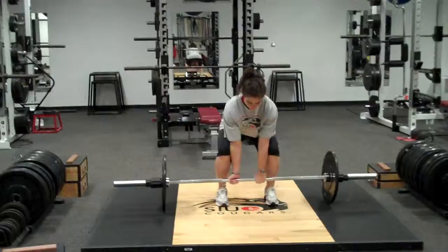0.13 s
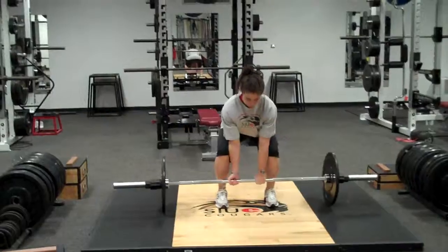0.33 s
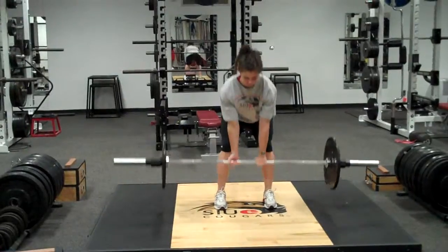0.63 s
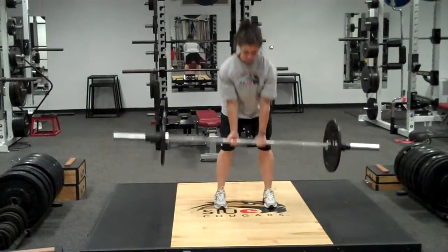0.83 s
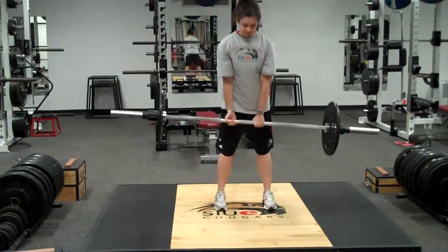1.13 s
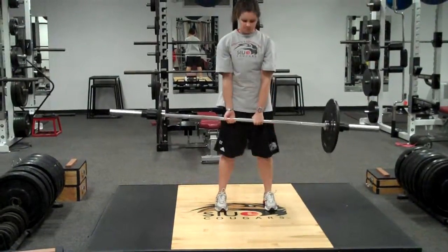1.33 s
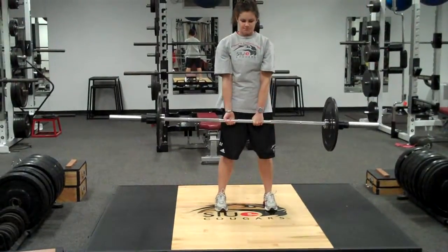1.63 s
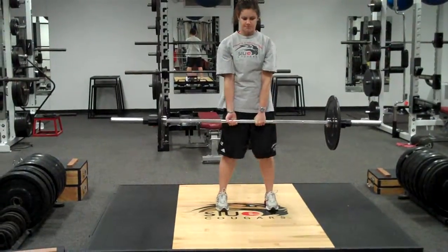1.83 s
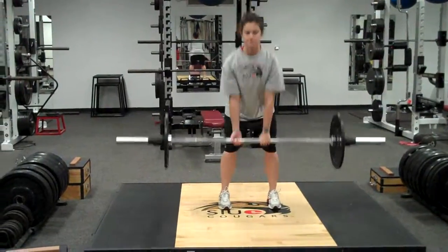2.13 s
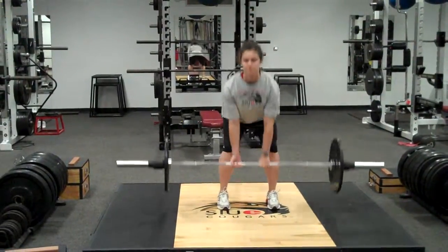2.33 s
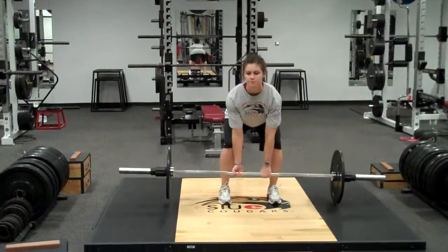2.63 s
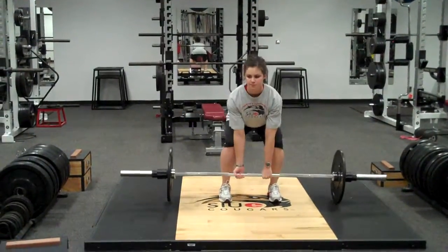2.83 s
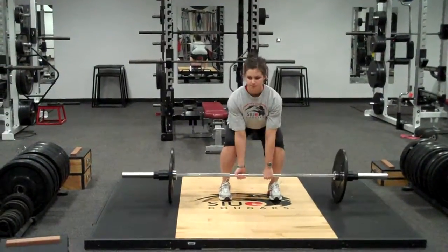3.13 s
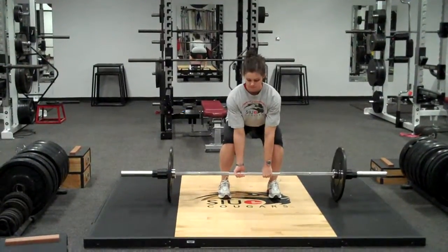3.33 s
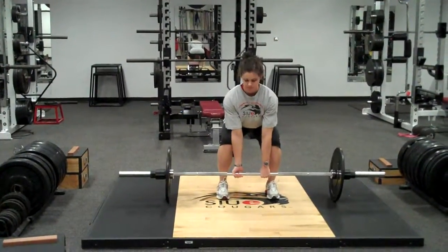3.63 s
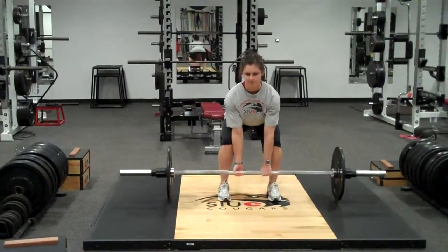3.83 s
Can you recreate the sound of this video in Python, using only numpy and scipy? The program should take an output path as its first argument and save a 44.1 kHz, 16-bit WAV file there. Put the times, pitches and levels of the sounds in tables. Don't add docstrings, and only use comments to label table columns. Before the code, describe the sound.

After a brief recorder thump, soles scrub softly and barbell plates tick upward; a quiet pause, then two hard, bright clanking landings with wooden thuds and a small settling rattle, in an echoing gym, from a few metres away.

```python
import sys
import numpy as np
from scipy import signal
from scipy.fft import rfft, irfft
from scipy.io import wavfile
from scipy.ndimage import uniform_filter1d

SR = 44100
rng = np.random.default_rng(int(sys.argv[2]) if len(sys.argv) > 2 else 0)


def waveform_to_disk(signal):
    frames = np.transpose(np.atleast_2d(signal))
    scaled = np.clip(frames, -1, 1) * 32767
    samples = np.round(scaled).astype(np.int16)
    wavfile.write(sys.argv[1], SR, samples)


def voltage_ratio(decibels):
    exponent = np.asarray(decibels, float) / 20
    return 10 ** exponent


N = 176400

# level in dB, low edge in Hz, high edge in Hz.
CRACKS = dict(pull=(4.1, 1200, 9800), lockout=(0.91, 2630, 7400), first=(-11, 3200, 5700),
          second=(-4.5, 1180, 7200), settle=(0, 3100, 6300), platform=(-1, 370, 1900))


def table(rows, at, log=False):
    x, y = np.array(rows, float).T
    if log:
        return np.interp(np.log(at + 1), np.log(x), y)
    return np.interp(at, x, y)


def unit(x):
    return x / np.sqrt(np.mean(x ** 2))


def resonance(f, hz, width_hz):
    return 1 / (1 + (2 * (f - hz) / width_hz) ** 2)


def noise(gain, size=N):
    alike_hz = 2050
    hz = np.fft.rfftfreq(size, 1 / SR)
    a, b = rfft(rng.standard_normal((2, size)))
    alike = 1 / (1 + (hz / alike_hz) ** 2)
    mid = a * np.sqrt(1 + alike)
    side = b * np.sqrt(1 - alike)
    return irfft(gain(hz) * np.array([mid + side, mid - side]), size) / np.sqrt(2)


def walk(rate, size=N):
    hold = int(SR / rate) + 1
    steps = np.repeat(rng.standard_normal(size // hold + 1), hold)
    return 1.3 * uniform_filter1d(uniform_filter1d(steps, hold), hold)[:size]


def bands(lo_hz, count):
    for hz in lo_hz * 2 ** (np.arange(count) * 2 / 3):
        def window(f, hz=hz):
            return np.cos(np.pi / 2 * np.clip(3 / 2 * np.log2((f + 1) / hz), -1, 1))
        yield hz, window


def ventilation():
    # frequency in Hz, spectral density in dB per Hz.
    air_colour = [(30, -41.5), (95, -31), (120, -3.5), (300, -6.5), (700, -17), (1500, -27), (3000, -37.5),
                  (8000, -48.5)]
    # frequency in Hz, width in Hz, level in dB.
    duct_modes = [(79.3, 6.7, -70.5), (134, 50, -65.5), (204.6, 6.6, -59.5), (341.3, 7.8, -71),
                  (477.7, 60, -65.5)]
    lag_s = .00007
    swell = walk(0.27)
    air = 0
    for hz, window in bands(25.76, count=15):
        band = noise(lambda f: window(f) * voltage_ratio(table(air_colour, f, log=True)))
        air = air + band * voltage_ratio(.6 * swell + 0.53 * walk(5.3))
    ducts = noise(lambda f: sum(voltage_ratio(db) * np.sqrt(SR / width) * resonance(f, hz, width)
                                for hz, width, db in duct_modes))
    left, right = voltage_ratio(-49.5) * unit(air) + ducts
    return np.array([np.roll(left, int(lag_s * SR)), right])


def feet():
    # time in seconds, level in dB.
    scrub_level = [
        (.09, -51),
        (.2, -50.5),
        (.35, -52.5),
        (.55, -52.5),
        (.75, -70),
        (.9, -90),
    ]
    # frequency in Hz, level in dB.
    scrub_colour = [(300, 1.5), (700, -4), (1150, -2), (1400, -14.5), (1950, -7), (2600, -14), (4000, -25),
                    (6600, -31)]
    # frequency in Hz, width in Hz, height over the scrub in dB.
    scrub_peaks = [(1406, 45, 16.5), (1884, 120, 4.5)]

    def gain(f):
        peaks = 1 + sum((voltage_ratio(db) - 1) * resonance(f, hz, width) for hz, width, db in scrub_peaks)
        return voltage_ratio(table(scrub_colour, f, log=True)) * peaks * (f > 250)

    return unit(noise(gain)) * voltage_ratio(table(scrub_level, np.arange(N) / SR) + walk(32.0))


def struck(hits, modes, crack, size=4000):
    rise_s, detune, share_db, crack_t60_s = .0006, .012, 1.5, .004
    t = np.arange(size) / SR
    hz, db, t60 = np.array(modes, float).T[:, :, None]
    crack_db, low_hz, high_hz = crack
    band = signal.butter(2, (low_hz, high_hz), "band", fs=SR, output="sos")
    chance = rng.standard_normal((len(hits), 2, len(modes), 1))
    out = np.zeros(N + size)
    for (at, level_db, *contact), (tune, share) in zip(hits, chance):
        decay = voltage_ratio(db + share_db * share - 60 * t / t60)
        ring = (decay * np.sin(2 * np.pi * hz * (1 + detune * tune) * t)).sum(0)
        ring = ring * np.sin(np.pi / 2 * np.minimum(t / rise_s, 1)) ** 2
        grit = rng.standard_normal(size) * voltage_ratio(crack_db - 60 * t / (crack_t60_s + 4 * sum(contact)))
        if contact:
            push = np.hanning(int(contact[0] * SR / 2) + 3)
            ring = np.convolve(ring, push / push.sum())[:size]
        else:
            grit = .6 * grit
            grit[0] = 2.6 * voltage_ratio(crack_db)
        start = int(at * SR)
        out[start:start + size] += voltage_ratio(level_db) * (ring + signal.sosfilt(band, grit))
    return out[:N]


def pull_knocks():
    # start in seconds, level in dB.
    hits = [(.3805, -52), (.3823, -39), (.3843, -45), (.3872, -41), (.394, -50), (.4078, -34), (.4103, -42),
            (.4132, -43), (.4148, -41), (.4193, -44), (.4215, -38), (.449, -42)]
    # frequency in Hz, level in dB, decay time (t60) in seconds.
    modes = [(3870, -4, 0.0055), (4440, 0, 0.0037), (5360, -12, 0.0024), (5900, -1, 0.0028),
             (7260, 5.5, 0.012), (7780, 1, 0.0079), (8700, 0, 0.0047), (11100, 8, 0.0085),
             (13400, 1, 0.0072)]
    return struck(hits, modes, CRACKS["pull"])


def lockout_knocks():
    # start in seconds, level in dB.
    hits = [
        (1.1426, -38),
        (1.1485, -41),
        (1.155, -45),
        (1.1765, -56),
        (1.6435, -58),
    ]
    # frequency in Hz, level in dB, decay time (t60) in seconds.
    modes = [(2500, -16, 0.002), (3850, -8, 0.0037), (6560, -33, 0.0013), (9000, 1, 0.0014),
             (12500, 11, 0.0024)]
    return struck(hits, modes, CRACKS["lockout"])


def sleeve():
    # time in seconds, level in dB.
    spin_level = [
        (2.1, -102),
        (2.2, -79),
        (2.45, -80),
        (2.55, -85),
        (2.65, -77),
        (2.83, -81),
        (2.9, -92),
    ]
    whir = unit(noise(lambda f: resonance(f, 6700, width_hz=600)))
    return whir * voltage_ratio(table(spin_level, np.arange(N) / SR) + 1.1 * walk(30.1))


def first_plate():
    # start in seconds, level in dB.
    hits = [
        (2.8378, -13),
        (2.8388, -2),
        (2.8409, -11),
        (2.8427, -15),
        (2.8444, 1),
        (2.8497, -13),
        (2.8515, -12),
    ]
    # start in seconds, level in dB.
    rattle = [
        (2.8605, -35),
        (2.867, -29),
        (2.879, -31.5),
        (2.9, -13),
    ]
    # frequency in Hz, level in dB, decay time (t60) in seconds.
    modes = [(1450, -28.5, 0.0058), (3470, -22, 0.0028), (4430, -17, 0.0041), (5210, -17, 0.0034),
             (6260, -20.5, 0.0029), (6420, -15.5, 0.0073), (7250, -18, 0.0041), (7300, -12, 0.0078),
             (7940, -6.5, 0.0069), (10620, -14, 0.0055), (11200, -13.5, 0.004), (14300, -20.5, 0.011)]
    return struck(hits + rattle, modes, CRACKS["first"])


def platform_blows():
    # start in seconds, level in dB, contact time in seconds.
    blows = [
        (2.845, -46.5, 0.00043),
        (2.88, -41, 0.0008),
        (3.03, -41, 0.0028),
        (3.05, -37, 0.0014),
        (3.075, -39, 0.0021),
        (3.115, -37, 0.0019),
        (3.15, -35.5, 0.0034),
        (3.19, -42, 0.0049),
    ]
    # frequency in Hz, level in dB, decay time (t60) in seconds.
    modes = [(166, -4, 0.021), (230, 3.5, 0.049), (379, 0.5, 0.014), (548, 8.5, 0.011), (790, 16.5, 0.0082),
             (1230, -11, .015)]
    return struck(blows, modes, CRACKS["platform"])


def second_plate():
    # start in seconds, level in dB.
    hits = [
        (3.0277, -10),
        (3.0297, -19),
        (3.0333, -8),
        (3.0388, -20),
        (3.0415, -21),
    ]
    # start in seconds, level in dB.
    rattle = [
        (3.0457, -16),
        (3.0503, -21.5),
        (3.054, -34),
        (3.0691, -17.5),
        (3.0848, -28),
        (3.095, -17.5),
        (3.118, -17),
    ]
    # start in seconds, level in dB.
    late_rattle = [
        (3.1318, -16),
        (3.1565, -18),
        (3.174, -22),
    ]
    # frequency in Hz, level in dB, decay time (t60) in seconds.
    modes = [(1603, -13, 0.0071), (3010, -15, 0.0081), (3930, -21, 0.0043), (4730, -8, 0.0021),
             (6350, -9, 0.006), (7235, -6, 0.01), (7900, 1, 0.0036), (10500, -5.5, 0.0047),
             (11530, -6, 0.005), (14000, -9, 0.0067)]
    return struck(hits + rattle + late_rattle, modes, CRACKS["second"])


def settle_knocks():
    # start in seconds, level in dB.
    hits = [(3.8133, -37), (3.817, -32), (3.8202, -39), (3.8225, -29), (3.8275, -35), (3.8292, -32),
            (3.8342, -33), (3.8385, -37), (3.851, -39)]
    # frequency in Hz, level in dB, decay time (t60) in seconds.
    modes = [(3620, -9.5, 0.0024), (4350, -11, 0.0025), (6400, -3, 0.0062), (6780, 4.5, 0.0075),
             (7800, 1, 0.0056), (10360, 0.5, 0.0084), (14160, 4, 0.0075)]
    return struck(hits, modes, CRACKS["settle"])


def hall(size=49152):
    # frequency in Hz, decay time (t60) in seconds.
    decay = [(100, 1.2), (400, 1.8), (1500, 1.24), (4000, 0.94), (7000, 0.64), (13000, 0.34)]
    # delay in seconds, left level in dB, right level in dB.
    floor_echo = (.0057, -14, -10)
    # delay in seconds, left level in dB, right level in dB.
    echoes = [
        (.0122, -14, -8),
        (.021, -16, -12),
        (.029, -16, -14),
    ]
    lump_db, lump_fade_s, lump_s, rise_s = 3, .08, .0012, .010
    t = np.arange(size) / SR
    tail = 0
    for hz, window in bands(61.3, count=13):
        tail = tail + noise(window, size=size) * voltage_ratio(-60 * t / table(decay, hz, log=True))
    wander = np.array([walk(1 / lump_s, size=size) for _ in "lr"])
    lumps = voltage_ratio(lump_db * np.exp(-t / lump_fade_s) * wander)
    out = voltage_ratio(-31.5) * tail * lumps * (1 - np.exp(-(t / rise_s) ** 2))
    out[:, 0] += 1
    for lag_s, left_db, right_db in [floor_echo] + echoes:
        out[:, int(lag_s * SR)] += voltage_ratio(np.array([left_db, right_db]))
    return out


def scene():
    knocks = pull_knocks() + lockout_knocks() + first_plate()
    knocks = knocks + platform_blows() + second_plate() + settle_knocks()
    knocks = signal.sosfilt(signal.butter(2, 110, "high", fs=SR, output="sos"), knocks)
    return signal.fftconvolve(knocks[None], hall())[:, :N] + ventilation() + feet() + sleeve()


def causal(rows, size=4096):
    level = voltage_ratio(table(rows, np.fft.rfftfreq(size, 1 / SR), log=True))
    cepstrum = irfft(np.log(level), size)
    cepstrum[1:size // 2] *= 2
    cepstrum[size // 2:] = 0
    return irfft(np.exp(rfft(cepstrum)), size)[:size // 2]


def band_limit(x):
    return signal.sosfilt(signal.butter(12, 16400, fs=SR, output="sos"), x)


def record(dry):
    # frequency in Hz, level in dB.
    left_port = [(100, -0.5), (5000, 6), (5600, 4.5), (6500, 8), (7900, 15), (8200, 4), (8600, 5),
                 (15000, -18)]
    # frequency in Hz, level in dB.
    right_port = [(100, 0.5), (5000, 5), (5600, 6.5), (6500, 15.5), (7200, -8.5), (8200, -5), (8600, -19.5),
                  (15000, -29.5)]
    start_s, settle_s, fade_s = .0862, 0.091, 0.011
    t = np.arange(N) / SR
    ports = np.array([causal(left_port), causal(right_port)])
    x = signal.fftconvolve(dry, ports, axes=1)[:, :N]
    hiss, rumble = rng.standard_normal((2, 2, N))
    rumble = unit(signal.sosfilt(signal.butter(2, 60, fs=SR, output="sos"), rumble))
    x = x + voltage_ratio(-73.5) * hiss + voltage_ratio(-63.5) * rumble
    x = signal.sosfilt(signal.ellip(12, .2, 75, 14250, fs=SR, output="sos"), x)
    offset = voltage_ratio(np.array((-20.5, -27.5)))[:, None] * [[-1], [1]]
    offset = offset * np.exp(-(t - start_s) / fade_s) * (t < settle_s)
    offset = offset * (2 * np.clip((t - start_s) / 0.0026, 0, 1) ** 0.31 - 1.0)
    x = (x + offset) * (t > start_s)
    return band_limit(np.clip(x, -1, 1))


dry = scene()
out = record(dry)
waveform_to_disk(out)
```